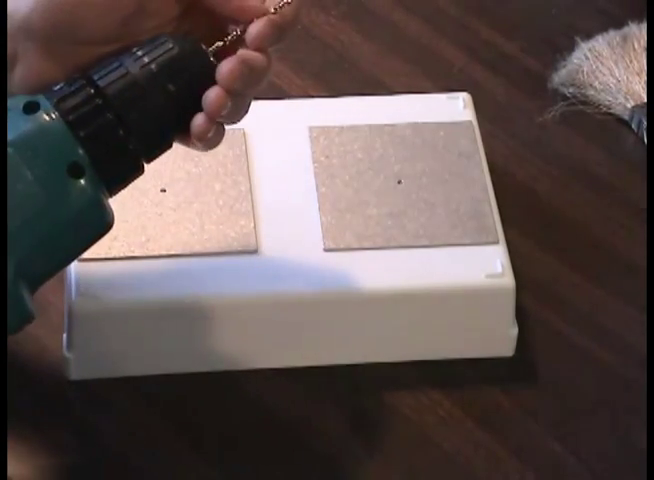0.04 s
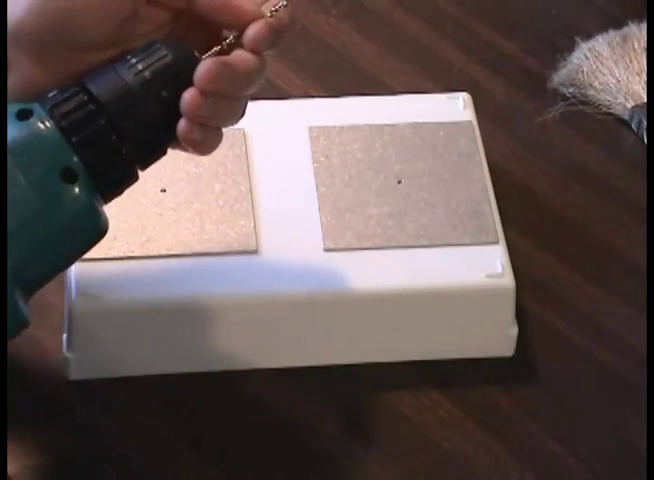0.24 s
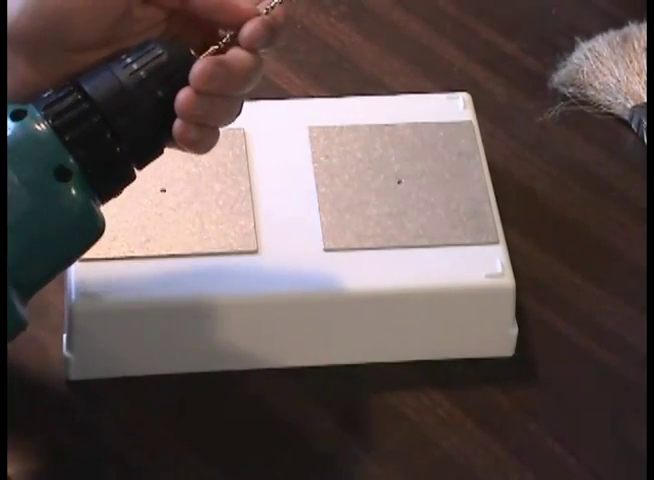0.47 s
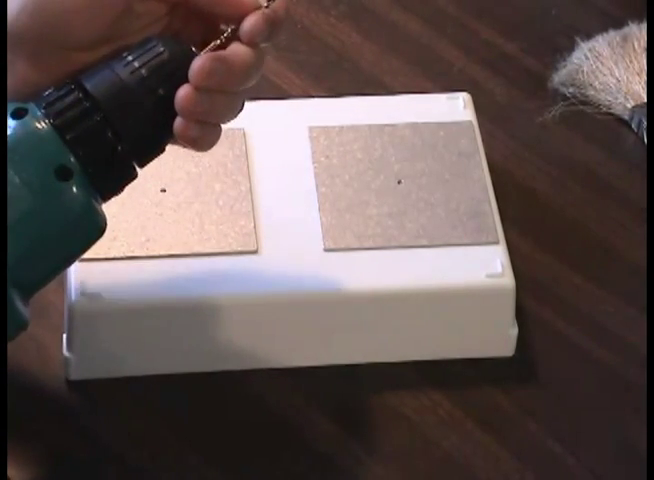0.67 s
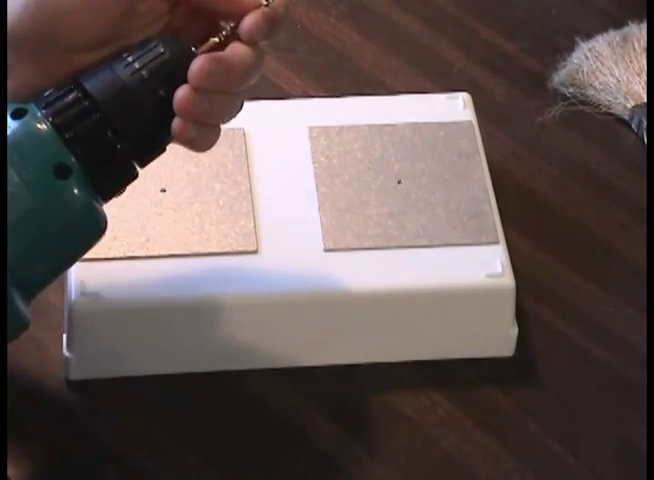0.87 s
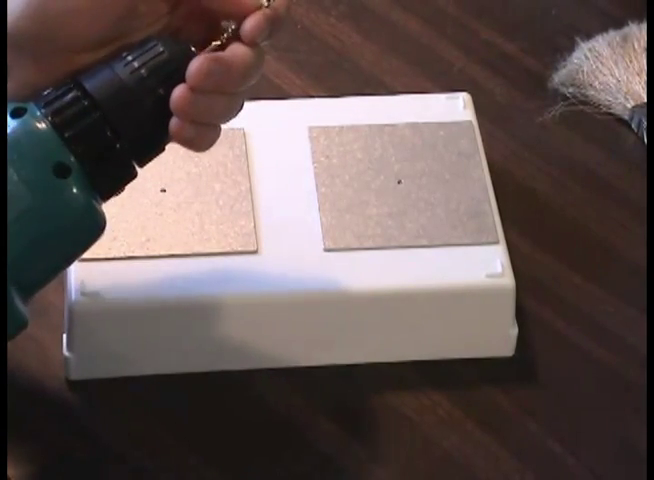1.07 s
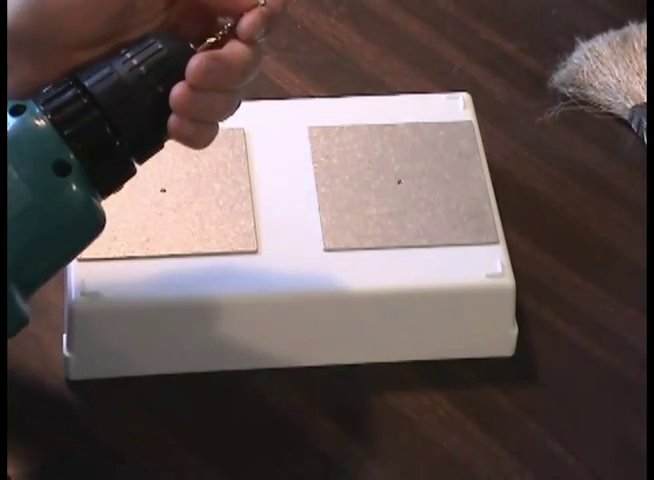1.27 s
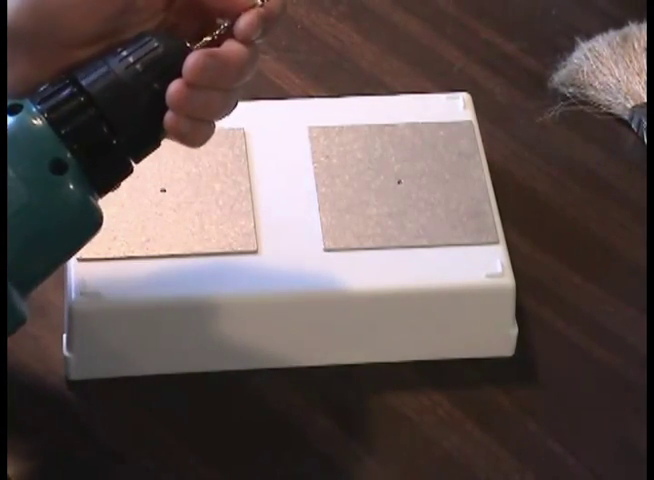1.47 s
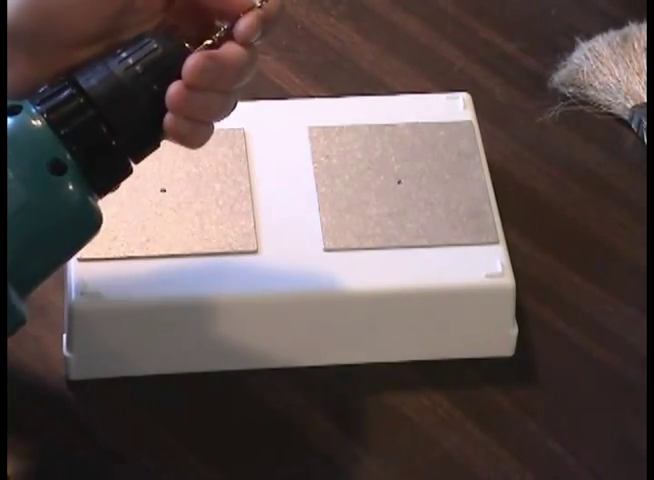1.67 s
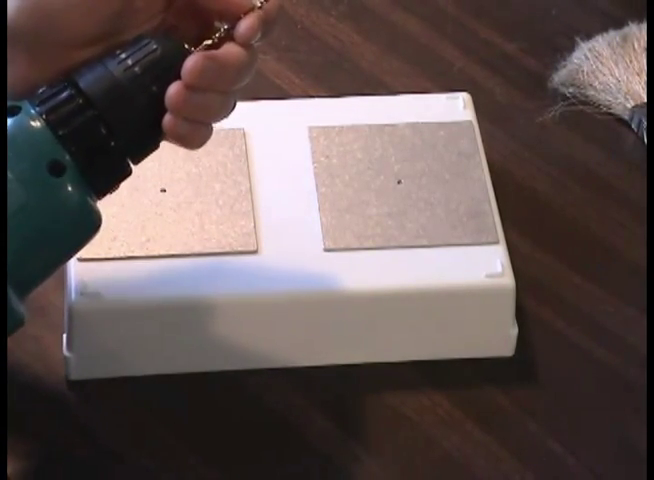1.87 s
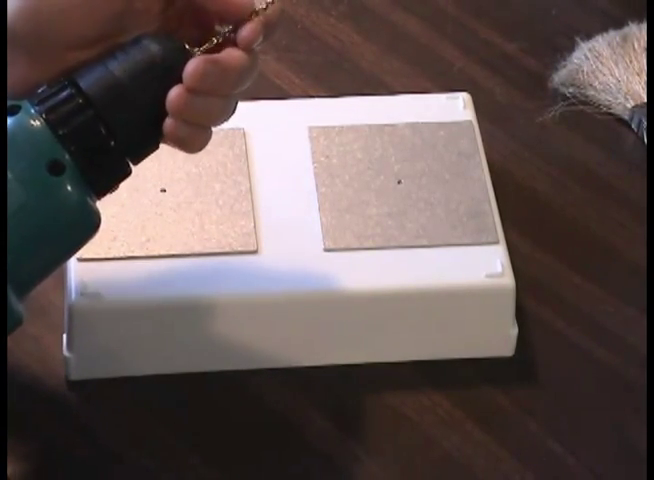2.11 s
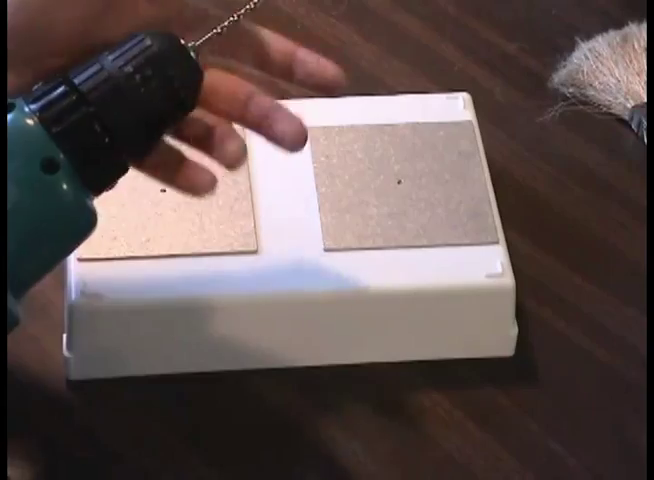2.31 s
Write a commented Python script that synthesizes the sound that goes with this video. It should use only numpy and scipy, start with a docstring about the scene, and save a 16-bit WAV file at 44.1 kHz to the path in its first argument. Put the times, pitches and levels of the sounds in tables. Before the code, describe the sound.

Close rattling and grinding of a hand-turned drill chuck, with sharp clicks, in a small room.

```python
"""A hand twists the keyless chuck of a drill shut in eight uneven strokes, close up in a small room.
Over quiet room tone, the sleeve first clicks as its play is taken up. Thread and gears then grind
as a dense stream of tiny impacts, and the loose jaws jingle as each stroke starts. From the second
stroke on, the spindle squeals faintly at speed and the drill twice jolts in the hand. The last stroke
brings the loudest click and the second jolt, then the grinding fades and one soft click follows."""
import sys
import numpy as np
from scipy import signal
from scipy.fft import rfft, irfft, next_fast_len
from scipy.io import wavfile
from scipy.ndimage import map_coordinates

SR = 44100
rng = np.random.default_rng(int(sys.argv[2]) if len(sys.argv) > 2 else 0)


def to_wav(sig):
    """Store sig (one row per channel, or 1-D mono) as 16-bit WAV at the path in sys.argv[1].

    Samples outside -1..1 are clipped; the rate is SR.
    """
    pcm = np.clip(np.atleast_2d(sig), -1, 1) * 32767
    pcm = np.round(pcm).astype(np.int16)
    wavfile.write(sys.argv[1], SR, pcm.T)  # frames by channels


N = 108045

# Colour of the room's hiss. Each row: frequency in Hz, relative level in dB.
AIR_COLOUR = [(15, -38), (25, -9), (120, -5.5), (153, -9), (205, -14), (1070, -12.5), (1250, -22),
              (1680, -14), (1870, -19), (2940, -14), (5710, -20.5), (10800, -28), (14500, -34)]
# Width of that hiss. Each row: frequency in Hz, side over mid in dB.
AIR_WIDTH = [(30, -5), (120, 4.5), (500, 3), (3000, -7.5), (10000, -1)]
# Steady tones in the room. Each row: pitch in Hz, level in dB.
HUM_TONES = [(121, -69), (1647, -66.5)]
AIR_DB = -52.5
WHISTLE_HZ, WHISTLE_WIDTH_HZ, WHISTLE_DB = 15400, 170, -59

# Resonances of chuck and drill body. Each row: centre in Hz, width in Hz, lift in dB.
BODY_MODES = [(750, 40, 3), (1040, 50, 2), (1540, 50, 3.5), (1722, 45, 4), (1842, 30, 3), (1980, 45, 4),
              (2615, 90, 4), (2800, 45, 3), (2915, 60, 3), (3200, 130, 2), (3445, 110, 3.5), (4550, 130, 2),
              (4752, 50, 2.5), (7950, 110, 4)]

# Sleeve clicks. Each row: start in seconds, level in dB on top of CLICK_DB, knock over tick in dB.
SLEEVE_CLICKS = [(0.1584, -24.5, -23), (0.1716, -28, -12), (0.1772, -16.5, -7), (0.203, -21, 0),
                 (0.374, -21.5, 3.5), (0.467, -2.5, -9), (0.7005, -3, -13), (0.972, -8.5, -1),
                 (1.178, -6, -3.5), (1.287, -13.5, -6), (1.4334, -3, -12), (1.5, -14.5, -6.5),
                 (1.543, -9.5, -7), (1.655, -5.5, -8), (1.726, -13, -7), (1.865, -3, -8), (2.114, -10, 3.5),
                 (2.123, 2.5, -8.5), (2.2685, -20, -25)]
# Colour of the bright tick. Each row: frequency in Hz, relative level in dB.
TICK_COLOUR = [(60, -68), (400, -19.5), (1500, -13.5), (2300, -7.5), (3000, 3.5), (3450, -6), (4300, -7),
               (5700, -6), (6600, -10), (8000, -9.5), (11000, -25), (15000, -37)]
# Colour of a knock in the hollow housing. Each row: frequency in Hz, relative level in dB.
HOLLOW_COLOUR = [(60, -63), (250, -35.5), (400, -16), (550, -11), (780, 2.5), (1050, 3.5), (1700, -6.5),
                 (3000, -23.5), (8000, -35)]
CLICK_DB, CLICK_RISE_S, CLICK_T60_S = -9.5, 0.00022, 0.016
CHATTER_DB, CHATTER_T60_S = -5, 0.062

# Twists of the hand, one list per stroke. Each row: time in seconds, turning speed as a level in dB,
# extra rasp and fizz in dB as the thread bites.
HAND_STROKES = [
    [(0.196, -37, -8), (0.207, -26.5, -2), (0.25, -17.5, -0.5), (0.28, -18.5, 5), (0.305, -20.5, 1.5),
     (0.335, -18, 2), (0.37, -24, 3.5)],
    [(0.40, -22, -1.6), (0.43, -15.5, 0.42), (0.48, -15.5, 1.8), (0.53, -15.5, 3.2), (0.605, -14, 2.9),
     (0.685, -15.5, 3.4), (0.725, -13, 0), (0.785, -18, -1.4)],
    [(0.825, -23.5, -0.29), (0.855, -16.5, 0.16), (0.925, -13.5, 0.15), (0.96, -16, 0.25),
     (0.99, -13.5, -1.1)],
    [(1.04, -20, 0), (1.073, -14.5, 0), (1.15, -14, 0), (1.175, -17, 0.75), (1.205, -14, 0), (1.28, -28, 0)],
    [(1.315, -27.5, 4), (1.365, -17, -5), (1.40, -19.5, 3), (1.45, -21, -3), (1.49, -30.5, 14)],
    [(1.53, -27.5, -1), (1.572, -18, -1.5), (1.605, -15.5, -1.5), (1.635, -19.5, 1.5), (1.67, -18.5, 1.5),
     (1.71, -25.5, -1)],
    [(1.755, -26, 2), (1.78, -15.5, -9.5), (1.815, -15.5, 2), (1.85, -16, -4.5), (1.88, -18, 1)],
    [(1.932, -22.5, 0), (1.962, -15, -4), (2.01, -13.5, 0.5), (2.075, -13.5, 1), (2.10, -14.5, 0),
     (2.135, -14.5, -0.5), (2.19, -22, 3.5), (2.215, -32.5, 14), (2.25, -35, 7), (2.30, -52, 9)],
]
# Colour of the grinding housing. Each row: frequency in Hz, relative level in dB.
GRIND_COLOUR = [(60, -64.5), (250, -29), (370, -18.5), (520, -5), (720, -3.5), (1100, 1), (1500, 4.5),
                (2200, 0.5), (2900, 0), (3450, 1), (3900, -4), (5200, -6), (6300, -8.5), (8200, -14),
                (10000, -39.5), (15000, -23.5)]
# Colour of the thread's rasp. Each row: frequency in Hz, relative level in dB.
RASP_COLOUR = [(300, -31), (1500, -18.5), (2700, -0.5), (4000, -1), (4700, 1.5), (5600, 0.5), (6300, -6),
               (7500, 0), (9200, -3.5), (9900, -11.5), (11000, -12), (12000, -20), (13100, -14.5),
               (15600, -31)]
# Colour of the fizz of sliding steel. Each row: frequency in Hz, relative level in dB.
FIZZ_COLOUR = [(3000, -49), (8500, -15), (9900, 2.5), (11000, 5), (12000, -8), (13100, -3), (13900, -17),
               (14600, -23), (15600, -18)]
FULL_SPEED_DB, FULL_SPEED_HITS_PER_S = -13.5, 13000
GRIND_DB, RASP_DB, FIZZ_DB = -3, -3, -18.5
DENSITY_SLOPE, GRIND_SLOPE, RASP_SLOPE, FIZZ_SLOPE = 0.8, 0.94, 1.74, 2.5  # dB per dB of speed

# Jingles of the loose jaws. Each row: start in seconds, length in seconds, level in dB,
# housing over steel in dB.
JAW_JINGLES = [(0.202, 0.1, -28.5, 2.5), (0.404, 0.031, -24, -4.5), (0.82, 0.1, -23.5, -8),
               (1.058, 0.044, -21.5, -22), (1.34, 0.052, -19, -4.5), (1.556, 0.037, -18, -8),
               (1.757, 0.085, -23.5, -6), (1.94, 0.049, -19, -11)]
# Colour of the steel jaws. Each row: frequency in Hz, relative level in dB.
JAW_COLOUR = [(600, -29), (1450, 4), (1720, 9), (1950, -24), (2500, 8), (3100, 12.5), (3500, -17),
              (4200, -38), (6800, -14), (8050, 13), (8600, 1.5), (9150, 13), (9900, -24), (10800, -18),
              (12000, -10), (15000, -26)]
JAW_HITS_PER_S = 2400
JAW_RING_HZ, JAW_RING_T60_S, JAW_RING_DB = 1716, 0.16, -4.5

# Squeals of spindle and thread. Each row: start in seconds, length in seconds, first pitch in Hz,
# last pitch in Hz, level in dB.
SPINDLE_SQUEALS = [(0.485, .155, 560.5, 766, -25.5), (0.593, 0.03, 4550, 4590, -18.5),
                   (0.649, 0.068, 4574, 4670, -22), (0.698, 0.031, 813, 568, -22.5),
                   (0.904, 0.07, 4600, 4580, -29), (0.915, 0.032, 550, 577, -28.5),
                   (1.12, 0.034, 569.5, 578, -30), (2.027, 0.074, 535, 645, -29)]
SQUEAL_BEND, SQUEAL_ROUGHNESS_RAD = 1.7, 0.049

# Jolts of the drill in the hand. Each row: start in seconds, level in dB.
HAND_JOLTS = [(0.699, -38), (2.122, -33.5)]
JOLT_HZ, JOLT_T60_S = 24.2, 0.19

# The room's decay. Each row: frequency in Hz, time to fall 60 dB in seconds.
ROOM_DECAY = [(200, 1), (600, 0.36), (2000, 0.33), (6000, 0.43), (14000, 0.067)]
# Stereo width of the chuck. Each row: frequency in Hz, side over mid in dB.
CHUCK_WIDTH = [(60, -34), (200, -17), (350, -14), (1000, -15.5), (2500, -16), (5000, -15), (6000, -7),
               (7200, 0.5), (8200, -3), (9500, -2.5), (15000, -4)]
# Balance of the chuck. Each row: frequency in Hz, left over right in dB.
CHUCK_PAN = [(300, -3), (700, -3.5), (1500, 0), (5000, -.5), (7000, 1), (9000, 0.5), (11000, 2.5),
             (15000, 0.5)]
REVERB_DB, TOP_HZ = -12.5, 15800


def amp(db):
    """Decibels to gain."""
    return 10 ** (np.asarray(db) / 20)


def unit(x):
    """Scale to rms 1."""
    return x / np.sqrt(np.mean(x ** 2) + 1e-20)


def along(points, hz):
    """Read a curve of (Hz, value) points on a log frequency axis."""
    knots_hz, values = np.transpose(points)
    return np.interp(np.log(hz + 1), np.log(knots_hz + 1), values)


def clock():
    """Time of each sample in seconds."""
    return np.arange(N) / SR


def equalise(x, gain_db, normalise=True):
    """Minimum-phase EQ with the given dB curve, by default of unit power."""
    size = 2 * next_fast_len(N)
    gain = amp(gain_db(np.fft.rfftfreq(size, 1 / SR)))
    cepstrum = irfft(np.log(np.maximum(unit(gain) if normalise else gain, 1e-6)), size)
    cepstrum[1:size // 2] *= 2
    cepstrum[size // 2 + 1:] = 0  # no ringing ahead of an attack
    return irfft(rfft(x, size) * np.exp(rfft(cepstrum)), size)[..., :N]


def through_body(x, colour):
    """A broad colour with the body's resonances on top."""
    def gain_db(f):
        peaks = sum(db / (1 + (2 * (f - hz) / width) ** 2) for hz, width, db in BODY_MODES)
        return along(colour, f) + peaks
    return equalise(x, gain_db)


def impacts(per_s, spread_db):
    """Random tiny impacts of uneven size, of mean power 1 at any density."""
    chance = np.clip(per_s / SR, 1e-4, 1)
    size = amp(spread_db * np.clip(rng.standard_normal(N), -2, 2)) * rng.choice([-1, 1], N)
    return unit((rng.random(N) < chance) * size / np.sqrt(chance))


def wobble(knots_per_s):
    """A smooth random curve."""
    return map_coordinates(rng.standard_normal(N // 20), [clock() * knots_per_s], mode="mirror")


def swell(start, length):
    """A rounded rise and fall."""
    return np.sqrt(np.abs(np.sin(np.pi * np.clip((clock() - start) / length, 0, 1))))


def decay(start, t60):
    """A hard attack that dies away."""
    t = clock() - start
    return (t >= 0) * np.exp(-np.log(1000) * np.abs(t) / t60)


def room_tone():
    """The bed: quiet, wide hiss, two steady tones and a faint high whistle of narrow noise."""
    mid, side = equalise(rng.standard_normal((2, N)), lambda f: along(AIR_COLOUR, f))
    side = equalise(side, lambda f: along(AIR_WIDTH, f), normalise=False)
    hum = sum(amp(db) * np.sqrt(2) * np.sin(2 * np.pi * hz * clock()) for hz, db in HUM_TONES)
    whistle = equalise(rng.standard_normal((2, N)),
                       lambda f: -20 * np.log10(1 + ((f - WHISTLE_HZ) / WHISTLE_WIDTH_HZ) ** 2))
    return amp(AIR_DB) * np.array([mid + side, mid - side]) + hum + amp(WHISTLE_DB) * whistle


def sleeve_clicks():
    """The sleeve takes up its play: a sharp tick with brief chatter, and a duller housing knock."""
    tick, knock = np.zeros(N), np.zeros(N)
    for start, db, knock_db in SLEEVE_CLICKS:
        attack = np.clip((clock() - start) / CLICK_RISE_S, 0, 1)
        tail = decay(start, CLICK_T60_S) + amp(CHATTER_DB) * decay(start, CHATTER_T60_S)
        blow = amp(db + CLICK_DB) * attack * tail
        tick += blow
        knock += amp(knock_db) * blow
    grit = rng.choice([-1., 1.], (2, N))
    return through_body(tick * grit[0], TICK_COLOUR) + through_body(knock * grit[1], HOLLOW_COLOUR)


def grinding():
    """Thread and gears: faster turning gives denser, louder impacts, more rasp and at last a fizz."""
    times, stroke_db, bites = np.concatenate(HAND_STROKES).T
    speed_db = np.interp(clock(), times, stroke_db, left=-90, right=-90) - FULL_SPEED_DB
    bite_db = np.interp(clock(), times, bites)
    hits_per_s = FULL_SPEED_HITS_PER_S * amp(DENSITY_SLOPE * speed_db)
    judder_db = 0.47 * wobble(knots_per_s=98)
    layers = [(GRIND_DB + GRIND_SLOPE * speed_db, GRIND_COLOUR),
              (RASP_DB + RASP_SLOPE * speed_db + bite_db, RASP_COLOUR),
              (FIZZ_DB + FIZZ_SLOPE * speed_db + bite_db, FIZZ_COLOUR)]
    out = np.zeros(N)
    for layer_db, colour in layers:
        envelope = amp(FULL_SPEED_DB + layer_db + judder_db)
        out += through_body(impacts(hits_per_s, spread_db=3) * envelope, colour)
    return out


def jaw_jingles():
    """The steel jaws rattle and ring in their slots as a stroke starts, shaking the hollow housing."""
    steel_envelope, housing_envelope = np.zeros(N), np.zeros(N)
    for start, length, db, housing_db in JAW_JINGLES:
        steel_envelope += amp(db) * swell(start, length) ** 2
        housing_envelope += amp(db + housing_db) * swell(start, length)
    rattle = impacts(JAW_HITS_PER_S, spread_db=3) * steel_envelope
    ping = decay(0, JAW_RING_T60_S) * np.sin(2 * np.pi * JAW_RING_HZ * clock())
    ring = signal.fftconvolve(rattle, ping / np.linalg.norm(ping))[:N]
    housing = through_body(impacts(JAW_HITS_PER_S, spread_db=2) * housing_envelope, HOLLOW_COLOUR)
    return through_body(rattle, JAW_COLOUR) + amp(JAW_RING_DB) * ring + housing


def spindle_squeals():
    """Spindle and thread sing in short, slightly rough glides: rises level off, falls steepen."""
    out = np.zeros(N)
    for start, length, first_hz, last_hz, db in SPINDLE_SQUEALS:
        progress = np.clip((clock() - start) / length, 0, 1)
        bend = SQUEAL_BEND if last_hz > first_hz else 1 / SQUEAL_BEND
        hz = last_hz + (first_hz - last_hz) * (1 - progress) ** bend
        phase = 2 * np.pi * np.cumsum(hz) / SR + SQUEAL_ROUGHNESS_RAD * wobble(knots_per_s=600)
        out += amp(db) * swell(start, length) * np.sqrt(2) * np.sin(phase)
    return out


def hand_jolts():
    """The drill jolts in the hand: a faint sub thump under two of the hard clicks."""
    return sum(amp(db) * decay(start, JOLT_T60_S) * np.sin(2 * np.pi * JOLT_HZ * (clock() - start))
               for start, db in HAND_JOLTS)


def reverb(x):
    """The small room's tail, longest in the bass and shortest at the very top."""
    hz, t, noise = signal.stft(rng.standard_normal(SR // 2), SR, nperseg=256)
    fade = np.exp(-np.log(1000) * t / along(ROOM_DECAY, hz)[:, None])
    tail = signal.istft(noise * fade, SR, nperseg=256)[1]
    predelay = np.zeros(SR // 250)
    return signal.fftconvolve(x, np.r_[predelay, tail / np.linalg.norm(tail)])[:N]


def widen(x):
    """Each impact throws its treble a new way; the low end stays narrow, a little to the right."""
    spectra = signal.stft(x, nperseg=256)[2]
    random_phase = np.exp(2j * np.pi * rng.random(spectra.shape))
    scattered = signal.istft(spectra * random_phase, nperseg=256)[1][:N]
    side = equalise(unit(scattered) * x.std(), lambda f: along(CHUCK_WIDTH, f), normalise=False)
    return np.array([equalise(x + sign * side, lambda f: sign * along(CHUCK_PAN, f) / 2, normalise=False)
                     for sign in (1, -1)])


def scene():
    """The mix: chuck and reverb widened together, over dry jolts and room tone."""
    chuck = grinding() + jaw_jingles() + sleeve_clicks() + spindle_squeals()
    return widen(chuck + amp(REVERB_DB) * reverb(chuck)) + hand_jolts() + room_tone()


def record(dry):
    """Clip the peaks at full scale, then cut everything above TOP_HZ."""
    size = next_fast_len(N + SR // 2)
    passband = np.fft.rfftfreq(size, 1 / SR) < TOP_HZ
    return irfft(rfft(np.clip(dry, -1, 1), size) * passband, size)[:, :N]


dry = scene()
out = record(dry)
to_wav(out)
```